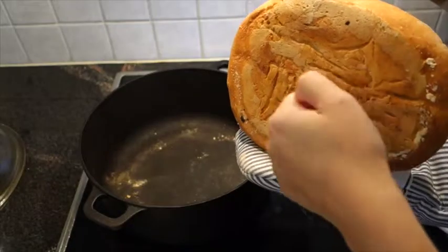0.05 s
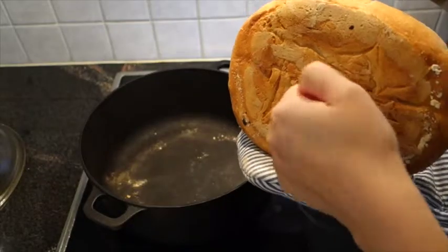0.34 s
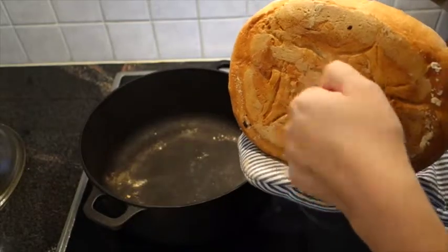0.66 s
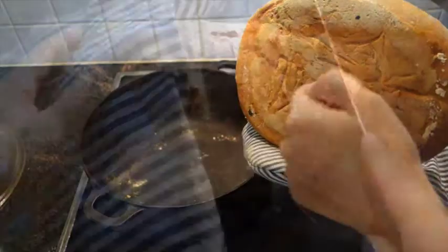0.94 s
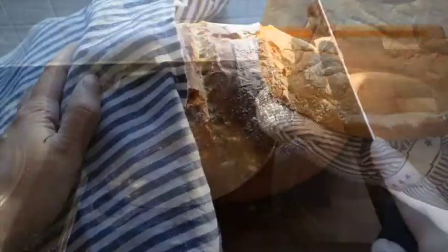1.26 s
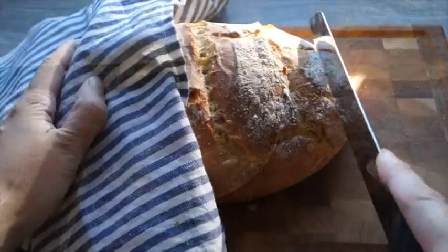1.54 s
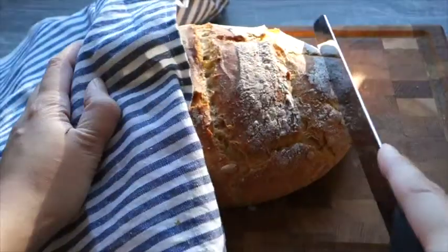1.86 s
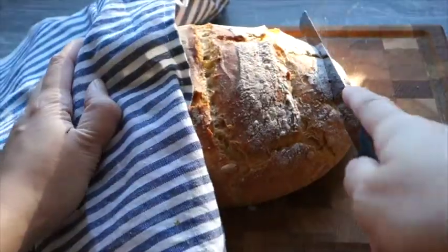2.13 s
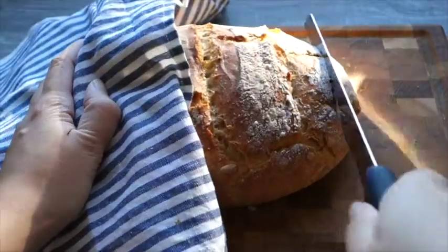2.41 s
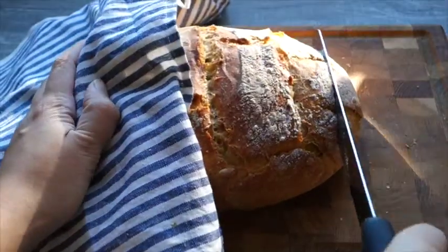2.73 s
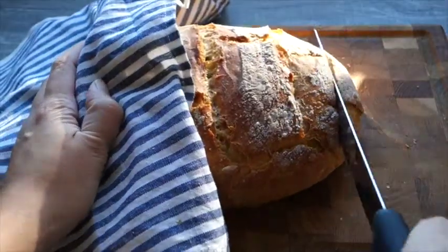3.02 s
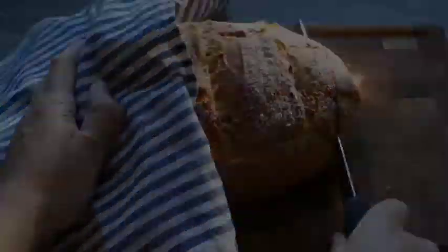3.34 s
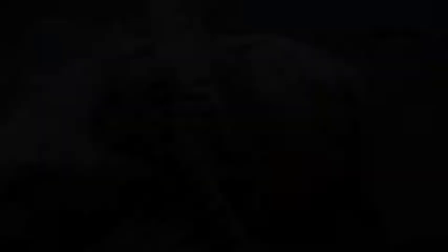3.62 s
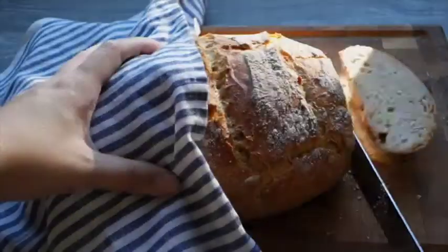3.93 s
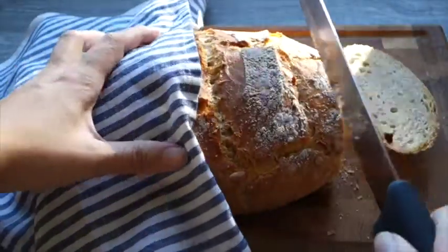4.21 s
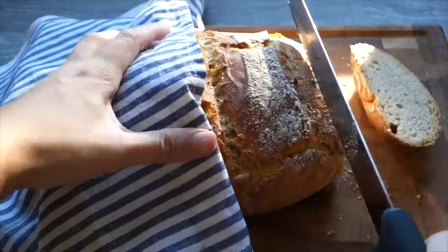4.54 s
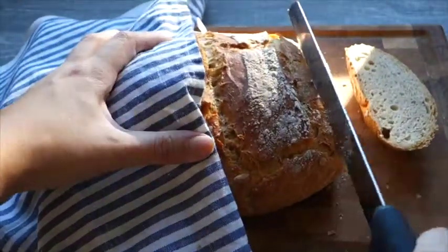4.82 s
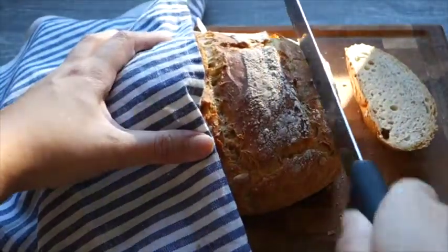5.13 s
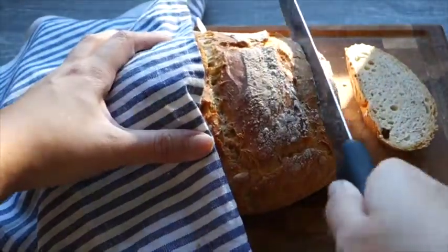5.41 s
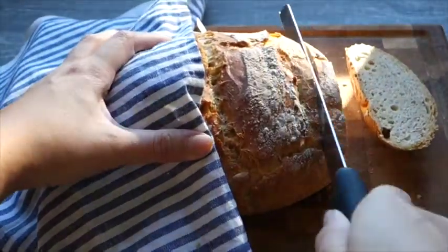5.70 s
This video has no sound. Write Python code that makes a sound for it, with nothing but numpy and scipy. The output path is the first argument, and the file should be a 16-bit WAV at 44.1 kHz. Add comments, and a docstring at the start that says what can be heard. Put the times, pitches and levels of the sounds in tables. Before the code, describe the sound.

In the first second, a fist knocks five times on the underside of a crusty loaf: hollow, low knocks, the first one softer, with a short tiled kitchen echo. A faint, steady low rush lies underneath and drops further at about 1 second.

From about 1.4 seconds, a serrated knife saws through the loaf on a wooden board, heard close up. The uneven strokes crunch and rasp, with sharp snaps of flaking crust and a dull drone from loaf and board, strongest between 2 and 3 seconds. Near 3.8 seconds the blade breaks through and knocks on the board, followed by a brief lull. From 4.3 to 4.6 seconds the loaf bumps and drags softly over crumbs while the knife taps lightly. At 4.7 seconds a second cut begins, with a sharper knife tap near 5.7, crackling on until almost 6 seconds.

```python
"""Five hollow knocks, then crunchy sawing, in a tiled kitchen with a low, steady rush.
A fist knocks on the underside of a crusty loaf. Then a toothed knife saws it on a wooden board:
the teeth break countless flakes of crust, whose cracks shake blade, loaf and board.
The slice breaks off, the loaf bumps on the board as it is shifted, and the next cut begins."""
import sys
import numpy as np
from scipy import signal
from scipy.fft import rfft, irfft
from scipy.io import wavfile

SR = 44100
rng = np.random.default_rng(int(sys.argv[2]) if len(sys.argv) > 2 else 0)


def to_wav(sig):
    """Store sig (one row per channel, or 1-D mono) as 16-bit WAV at the path in sys.argv[1].

    Samples outside -1..1 are clipped; the rate is SR.
    """
    pcm = np.clip(np.atleast_2d(sig), -1, 1) * 32767
    pcm = np.round(pcm).astype(np.int16)
    wavfile.write(sys.argv[1], SR, pcm.T)  # frames by channels


N = 258426
TIME = np.arange(N) / SR
SIDES = np.array([[1], [-1]])  # added on the left, taken away on the right
ATTACK_S, RELEASE_S = 0.011, 0.022  # the teeth take hold quickly and run out more slowly

# when the blade is in the loaf: t/s, length/s
CUT_SPANS = [(1.331, 2.62), (4.674, 1)]
# large flakes of crust snapping: t/s, peak/dB, splintering/0-1
BIG_SNAPS = [(1.4162, -23.5, 0.6), (1.5354, -21.5, .6), (1.7529, -15.5, 0.4), (1.7693, -17.5, .6),
             (1.8575, -25, 0.5), (2.004, -27.5, 0.6), (2.0307, -21, .56), (2.1465, -16, 0.3),
             (2.1762, -13, 0.2), (2.19, -13, .45), (2.2421, -14, 0.74), (2.4513, -13, 0.6),
             (2.4683, -13.5, 0.5), (2.5027, -14.5, 0.7), (2.5701, -22, 0.5), (2.5864, -15, 0.53),
             (2.7987, -14.5, .42), (2.8372, -17.5, 0.55), (2.871, -16.5, .4), (2.9257, -16, 0.5),
             (2.9405, -14.5, 0.6), (3.2128, -23.5, 0.7), (3.3139, -16, 0.38), (3.694, -19.5, 0.4),
             (3.822, -16.5, 0.34), (3.9387, -26, .3), (4.028, -34.5, 0.8), (4.7743, -15.5, .9),
             (4.962, -23.5, 0.4), (5.031, -19, 0.18), (5.0928, -14.5, .33), (5.3556, -23, 0.4),
             (5.3830, -18, .6), (5.575, -19.5, 0.4), (5.6995, -22, .55)]
# tone of snapping crust: f/Hz, level/dB
SNAP_TONE = [(150, -11), (400, -4), (1200, -18), (3000, -6.5), (5000, 3), (9000, 2.5), (16000, -1)]


def undb(db):
    """Turn decibels into a factor to multiply by."""
    return 10 ** (np.asarray(db) / 20)


def unit(x):
    """Scale a sound to an average power of one."""
    return x / np.sqrt(np.mean(x ** 2))


def add(out, s, x):
    """Mix a sound in, starting at s seconds."""
    i = int(s * SR)
    out[..., i:i + x.shape[-1]] += x[..., :N - i]


def through(x, response):
    """Play a sound through an object or room, given its response to a single click."""
    x = np.atleast_2d(x)
    return signal.fftconvolve(x, np.atleast_2d(response), axes=-1)[:, :x.shape[-1]]


def colour(points, size=4096):
    """A click response whose tone follows the rows f/Hz, level/dB."""
    hz, db = np.transpose(points)
    gain = undb(np.interp(np.log(np.arange(size // 2 + 1) * SR / size + 1), np.log(hz), db))
    # keep the tone, but pack the energy at the start (minimum phase)
    cepstrum = irfft(np.log(gain))
    cepstrum[1:size // 2] *= 2
    cepstrum[size // 2 + 1:] = 0
    return irfft(np.exp(rfft(cepstrum)))


def ring(modes, spread=0.):
    """A struck object's tones, detuned at random by spread; each fades 60 dB in its ring time."""
    t = TIME[:SR // 2]
    return sum(undb(db) * np.cos(2 * np.pi * hz * (1 + spread * rng.standard_normal()) * t)
               * np.exp(-np.log(1000) * t / ring_s) for hz, db, ring_s in modes)


def ports(mid, side, wide_hz, order=1):
    """Two close microphones: both hear mid, and side makes them differ above wide_hz."""
    treble = signal.butter(order, min(wide_hz, SR / 2 - 1), "high", fs=SR)
    return mid + SIDES * signal.lfilter(*treble, side)


def walk(rate):
    """Drift at random, roughly between -1 and 1, with rate turns a second."""
    steps = rng.standard_normal(N // 10)
    return np.interp(TIME * rate, np.arange(len(steps)), steps)


def swell(start, length, attack_s, release_s, rise_db=0):
    """Loudness of one movement: it fades in, changes by rise_db, then fades out."""
    t = TIME - start
    slope = undb(rise_db * (np.clip(t / length, 0, 1) - .5))
    return slope * np.exp(np.minimum(t, 0) / attack_s - np.maximum(t - length, 0) / release_s)


def background():
    """The low rush of the kitchen, stronger by the stove than at the board."""
    # tone of the rush by the stove, and everywhere: f/Hz, level/dB
    stove_tone = [(25, -10), (60, 2), (120, 10), (190, 8), (280, 8.5), (500, -3.5), (1000, -13),
                  (2000, -14), (3500, -29), (16000, -64.5)]
    hush_tone = [(25, -37), (80, -4), (170, 0), (270, 8.5), (450, -6), (1000, -11), (3000, -18.5),
                 (8000, -25.5), (16000, -29.5)]
    by_stove = np.interp(TIME, [.85, 1.35], [1, 0])
    mid, side = rng.standard_normal((2, N))
    air = ports(mid, side, wide_hz=2200, order=2) + 0.047 * SIDES * rng.standard_normal(N)
    air *= undb(0.59 * walk(17))
    stove = undb(-53.5) * by_stove * unit(through(air, colour(stove_tone)))
    return stove + undb(-61) * unit(through(air, colour(hush_tone)))


def blows(table, modes, spread, order):
    """Each blow makes an object ring; a softer contact leaves out the high tones."""
    out = np.zeros(N)
    for s, db, top_hz in table:
        sound = signal.sosfilt(signal.butter(order, top_hz, fs=SR, output="sos"), ring(modes, spread))
        add(out, s, undb(db) * sound / np.abs(sound).max())
    return out


def knocks(skin_hz):
    """Knuckles push the crust inwards; their skin cushions away the treble."""
    # knocks on the loaf: t/s, level/dB, treble limit/Hz
    hits = [(0.0318, -17, 420), (0.2769, -9, 882), (0.5654, -10.5, 886), (0.7638, -7, 1427),
            (0.9453, -13, 723)]
    # hollow tones of the loaf: f/Hz, level/dB, ring time/s
    loaf_modes = [(73.5, -22, 0.17), (125.6, 5, 0.042), (145.4, -22, .2), (172, -11, 0.23),
                  (281.5, -23.5, 0.46), (273, 11, 0.043), (446, -37, .025), (827, -5.5, 0.034),
                  (1100, 2, .013), (1425, -5.5, 0.021), (1930, -7, 0.034)]
    skin = signal.butter(4, skin_hz, fs=SR, output="sos")
    return -signal.sosfilt(skin, blows(hits, loaf_modes, spread=0.006, order=2))


def kitchen(x, wet_db, echo_db, low_ring_s, high_ring_s, wide_hz):
    """The room adds a few clear echoes and a blurred tail, whose level is set by wet_db."""
    # echoes off worktop, tiles and ceiling: delay/s, level/dB
    echoes = [(.0062, -16.5), (0.0168, -22), (0.0273, -13.5), (0.0423, -18.5)]
    # tone of the tail: f/Hz, level/dB
    room_tone = [(40, -24), (120, -7.5), (280, -9), (600, -2), (1200, -1), (3000, -4), (8000, -13),
                 (16000, -12.5)]
    t = TIME[:SR]
    noise = rng.standard_normal((2, SR))
    low = signal.sosfilt(signal.butter(2, 2200, fs=SR, output="sos"), noise)
    tail = low * np.exp(-np.log(1000) * t / low_ring_s)
    tail += (noise - low) * np.exp(-np.log(1000) * t / high_ring_s)
    fade_in = np.clip(t / 0.0029 - .5, 0, 1)
    mid, side = through(unit(tail * fade_in) / np.sqrt(SR), colour(room_tone))
    response = undb(wet_db) * ports(mid, side, wide_hz)
    for delay, db in echoes:
        add(response, delay, undb([db + echo_db]))
    return x + through(x, response)


def effort():
    """How strongly the crust crackles, the blade rasps and loaf and board drone as the saw moves."""
    # saw strokes: t/s, length/s, rise/dB, crackle/dB, rasp/dB, drone/dB
    strokes = [(1.36, 0.076, 3, -54, -76, -64), (1.525, 0.055, 7, -44.5, -63, -61),
               (1.635, 0.089, 11.5, -48, -62, -54.5), (1.751, .03, -1, -40, -45, -44),
               (1.857, 0.046, 3, -43.5, -56.5, -49.5), (2.035, 0.15, 6, -35, -45, -39.5),
               (2.22, 0.042, -0.5, -41.5, -49, -45), (2.32, 0.071, -6.5, -52.5, -52.5, -55.5),
               (2.462, .14, -2.5, -37.5, -50, -42.5), (2.677, 0.096, 4.5, -48.5, -63, -55),
               (2.803, .15, 4, -37.5, -56, -42), (3.037, .015, -5.5, -56, -67, -56),
               (3.216, 0.021, -4.5, -42, -47.5, -44.5), (3.271, 0.14, 10, -39.5, -47.5, -42.5),
               (3.479, 0.11, -5.5, -50, -48.5, -48), (3.698, .028, -7.5, -43.5, -45, -45.5),
               (3.788, 0.035, 5.5, -38.5, -34.5, -44), (3.84, 0.017, -4, -58, -38, -37),
               (3.882, 0.029, -2, -46.5, -41.5, -46), (4.0, 0.038, 0, -70, -54.5, -53),
               (4.12, 0.031, 2.5, -60, -54, -53), (4.682, 0.093, 8, -43, -45.5, -43),
               (4.836, .047, -4, -40.5, -42, -41.5), (4.956, .05, 0, -54.5, -55, -52),
               (5.043, 0.081, 2, -41, -43.5, -41.5), (5.214, 0.083, 4, -47.5, -46.5, -45),
               (5.369, 0.1, 3.5, -38.5, -40, -41), (5.554, 0.071, 1, -45, -48.5, -47),
               (5.702, 0.05, 7.5, -38.5, -44.5, -44), (5.776, 0.022, -1.5, -46, -44, -41),
               (5.858, .02, -4, -45.5, -45.5, -53)]
    # faint rubbing between strokes: crackle/dB, rasp/dB, drone/dB
    rub_db = [-62.5, -64, -59.5]
    in_loaf = sum(swell(s, length, RELEASE_S, RELEASE_S) for s, length in CUT_SPANS)
    power = np.outer(undb(rub_db), in_loaf) ** 2
    for s, length, rise_db, *levels in strokes:
        power += np.outer(undb(levels) ** 2, swell(s, length, ATTACK_S, RELEASE_S, rise_db) ** 2)
    return np.sqrt(power)


def teeth(catches_per_s, release_s, strength):
    """A tooth catches and lets go; its burst of cracking dies away over a steady scrape."""
    catches = (rng.random(N) < catches_per_s / SR) * rng.uniform(0.16, 1, N)
    bursts = signal.lfilter([1], [1, -np.exp(-1 / (release_s * SR))], catches)
    return unit((1 + strength * bursts) * undb(0.92 * walk(140)))


def stalling(hold_s, dip_db):
    """The level dips as the blade stalls against each large flake just before it gives way."""
    wait = np.full(N, np.inf)
    for s, _, _ in BIG_SNAPS:
        wait = np.minimum(wait, np.where(TIME < s, s - TIME, np.inf))
    return undb(dip_db * np.exp(-(wait / hold_s) ** 2))


def patches(wander_per_s, patchy_db, count):
    """The share of the cracks that falls on each patch of crust as the teeth travel over it."""
    weight = undb([patchy_db * walk(wander_per_s) for _ in range(count)])
    return weight / weight.sum(axis=0)


def fractures(rate, scatter_db, size=N):
    """Tiny random cracks, about rate a second: many faint ones, a few strong."""
    happens = rng.random(size) < rate / SR
    strength = np.minimum(rng.exponential(size=size), np.pi + 1)
    return happens * rng.choice([-1, 1], size) * undb(scatter_db * strength)


def flake(rattle_s, rattle, side_share, size=256):
    """One flake breaks: a sharp click and a brief rattle that reaches each microphone differently."""
    mid, side = rng.standard_normal((2, size)) * np.exp(-TIME[:size] / rattle_s)
    mid = rattle * unit(mid) / np.sqrt(size)
    side = side_share * unit(side) / np.sqrt(size)
    mid[0] += 1  # the click
    return ports(mid, side, wide_hz=7400, order=2) * undb(SIDES * -0.4)  # a little to the right


def sawing(crackle, rasp, drone):
    """Teeth break flakes in bursts; the same cracks shake blade, loaf and board."""
    # tone of the crackling crust, the droning loaf and the droning board: f/Hz, level/dB
    crust_tone = [(300, -26.5), (1500, -1), (2800, -1), (4200, 3.5), (5500, 1.5), (8000, -0.5), (12000, -3),
                  (16000, -8)]
    loaf_tone = [(50, -53.5), (120, -21.5), (200, -8), (275, 4.5), (335, -10), (388, 6), (470, -7.5),
                 (900, -40.5)]
    board_tone = [(200, -26), (440, -5.5), (550, 2.5), (650, -2.5), (760, -1.5), (890, -0.5), (1200, -11),
                  (2500, -34.5)]
    # tones of the blade in the cut: f/Hz, level/dB, ring time/s
    blade_modes = [(1050, 2, 0.0096), (1475, 5.5, 0.0084), (1760, -1, 0.0094), (1910, -12, 0.017),
                   (2430, -7.5, 0.016), (2840, 1.5, 0.0082)]
    # the blade's angle shifts the drone between loaf and board: t/s, board over loaf/dB
    blade_lean = [(1.5, -3.5), (2.1, -2.5), (2.55, -1.5), (2.75, -2), (2.87, 2), (3.0, 1), (3.4, 2),
                  (3.85, 3), (4.2, -4.5), (4.75, 2), (5.1, 5.5), (5.27, 0), (5.45, 2), (5.75, 0)]
    rate = 1000 + 5000 * (crackle / crackle.max()) ** .6  # harder strokes break more flakes a second
    bite = teeth(catches_per_s=110, release_s=0.0024, strength=1.2)
    bite *= stalling(hold_s=0.0088, dip_db=-2.5)
    cracks = [bite * fractures(rate * share, scatter_db=2.5) / np.sqrt(rate)
              for share in patches(wander_per_s=18, patchy_db=16, count=16)]
    crust = sum(through(patch, flake(rattle_s=0.0018, rattle=1.0, side_share=1.1)) for patch in cracks)
    crust = unit(through(crust, colour(crust_tone)))
    blade = unit(through(sum(cracks), ring(blade_modes)))
    # the soft inside of the bread drags more evenly on the flat of the blade
    shaking = unit(sum(cracks)) + bite * rng.standard_normal(N)
    loaf = unit(through(shaking, colour(loaf_tone)))
    board = unit(through(shaking, colour(board_tone)))
    lean = undb(np.interp(TIME, *np.transpose(blade_lean)))
    body = (loaf + lean * board) / np.hypot(1, lean)
    return undb(-0.96) * crackle * crust + rasp * blade + drone * body


def chips(crackle, per_s=32, above_db=16, scatter_db=4, splinter=0.46):
    """Small flakes chip off at random, as loud as the stroke allows; gives rows like BIG_SNAPS."""
    gaps, sizes = rng.random((400, 2)).T
    times = CUT_SPANS[0][0] + np.cumsum(.5 + gaps) / per_s
    return [(s, 20 * np.log10(crackle[int(s * SR)]) + above_db + scatter_db * (2 * size - 1), splinter)
            for s, size in zip(times, sizes) if s < TIME[-SR // 100]]


def snaps(table, crumble_s=.0014, size=1024):
    """Each flake gives way and splinters for a few milliseconds."""
    out, tone = np.zeros((2, N)), colour(SNAP_TONE)
    fade = np.exp(-TIME[:size] / crumble_s)
    for s, db, splinter in table:
        splinters = splinter * fractures(12000, scatter_db=1.4, size=size) * fade
        splinters[0] = 1  # the first break
        crack = through(flake(rattle_s=.0004, rattle=0.29, side_share=0.63), tone[:size])
        sound = signal.fftconvolve(crack, splinters[None])[:, :size]
        add(out, s + .0008, undb(db) * sound / np.abs(sound).max())
    return out


def skid(ring_s):
    """The teeth skate over the crust and keep one tone of the blade singing."""
    # skids of the blade: t/s, length/s, level/dB, f/Hz
    skids = [(1.486, 0.18, -52.5, 2820), (4.377, 0.0087, -56, 4310)]
    return sum(undb(db) * swell(s, length, attack_s=0.011, release_s=0.015)
               * unit(through(fractures(2500, scatter_db=3.5), ring([(hz, 0, ring_s)])))
               for s, length, db, hz in skids)


def shifting(soft_hz, side_db):
    """The blade breaks through, the loaf bumps and drags over crumbs, and the knife is set in place."""
    # blade, then rocking loaf, hitting the board: t/s, level/dB, treble limit/Hz
    board_bumps = [(3.841, -16, 2480), (3.848, -22.5, 700), (3.854, -25, 1110), (4.335, -31, 196),
                   (4.355, -30, 334), (4.381, -33.5, 494), (4.410, -33, 422), (4.452, -36, 262),
                   (4.481, -33.5, 333), (4.540, -32, 227), (4.570, -36.5, 260), (4.592, -39, 330)]
    # light taps of the knife: t/s, level/dB, treble limit/Hz
    knife_taps = [(4.2505, -38, 9100), (4.3612, -31, 8910), (4.4715, -30.5, 11000), (4.5530, -34, 8100),
                  (4.6462, -29.5, 14000), (5.6715, -22, 9080)]
    # tones of the board and of the tapping knife: f/Hz, level/dB, ring time/s
    board_modes = [(112, -26, 0.064), (204, -4, 0.029), (269, 0, 0.057), (400, -2.5, 0.074),
                   (553, -1, 0.05), (815, 14.5, 0.019), (1410, 23, 0.0098), (1870, -5, 0.026)]
    knife_modes = [(690, -8, 0.0082), (1540, -28, 0.0087), (1770, -15.5, 0.011), (2970, -11, 0.0043),
                   (4650, -4, 0.0053), (7250, -11, 0.0015), (12000, 2, 0.0014)]
    slips = [fractures(500, scatter_db=1.0) for _ in range(2)]
    soft_slips = signal.sosfilt(signal.butter(3, soft_hz, fs=SR, output="sos"), slips)
    mid, side = unit(through(soft_slips, ring(board_modes)))
    crumbs = unit(through([fractures(940, scatter_db=0) for _ in range(2)], colour(SNAP_TONE)))
    pull = undb(-48.5) * swell(start=4.345, length=0.26, attack_s=ATTACK_S, release_s=0.043, rise_db=-4)
    drag = pull * (mid + SIDES * undb(side_db) * side + undb(-18.5) * crumbs)
    bumps = blows(board_bumps, board_modes, spread=0.12, order=4)
    taps = blows(knife_taps, knife_modes, spread=0.11, order=2)
    return bumps + drag + taps


def scene():
    """Knocking by the stove, then cutting on the board."""
    knocking = kitchen(knocks(skin_hz=2200), wet_db=-1.5, echo_db=-2.5,
                       low_ring_s=0.54, high_ring_s=0.59, wide_hz=2500)
    rush = background()
    crackle, rasp, drone = effort()
    cutting = sawing(crackle, rasp, drone) + skid(ring_s=.02)
    cutting += shifting(soft_hz=320, side_db=-7.5)
    cutting += snaps(BIG_SNAPS + chips(crackle))
    cutting = kitchen(cutting, wet_db=-12.0, echo_db=-1.5,
                      low_ring_s=0.33, high_ring_s=0.56, wide_hz=4160)
    return knocking + rush + cutting


def record(dry):
    """The microphone loses the deep bass and the very highest treble."""
    dry = signal.sosfilt(signal.butter(2, 50, "high", fs=SR, output="sos"), dry)
    return signal.sosfilt(signal.ellip(10, .2, 80, 16050, fs=SR, output="sos"), dry)


dry = scene()
out = record(dry)
to_wav(out)
```